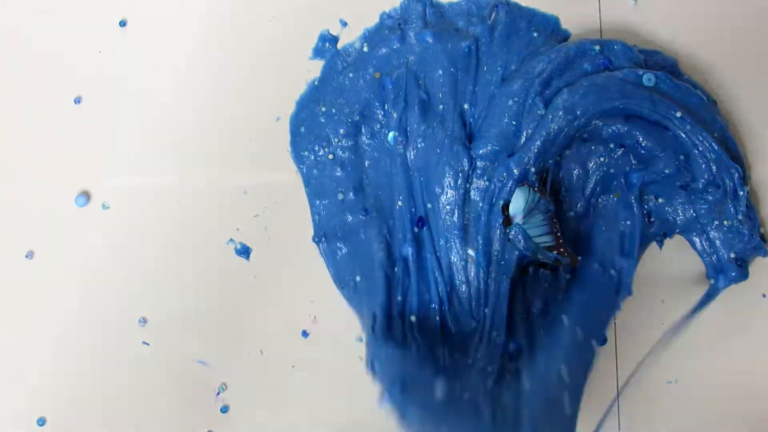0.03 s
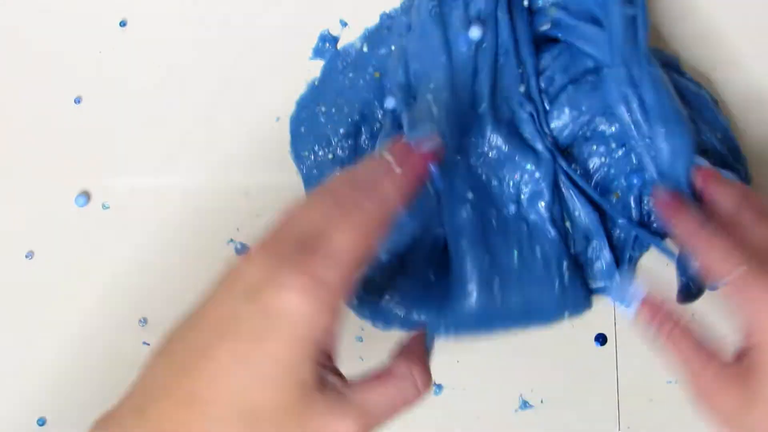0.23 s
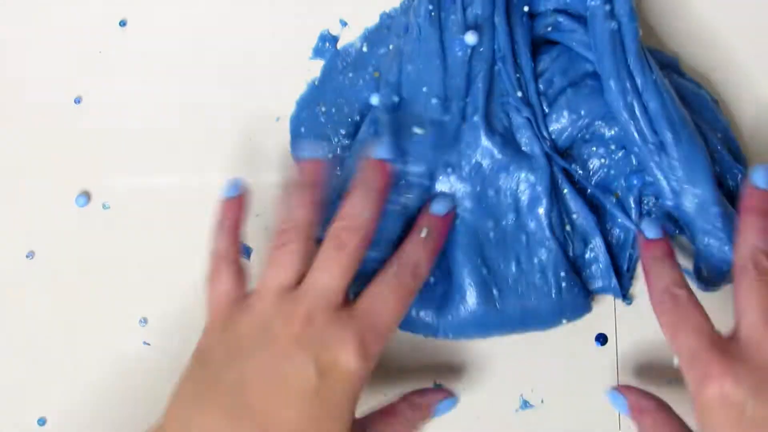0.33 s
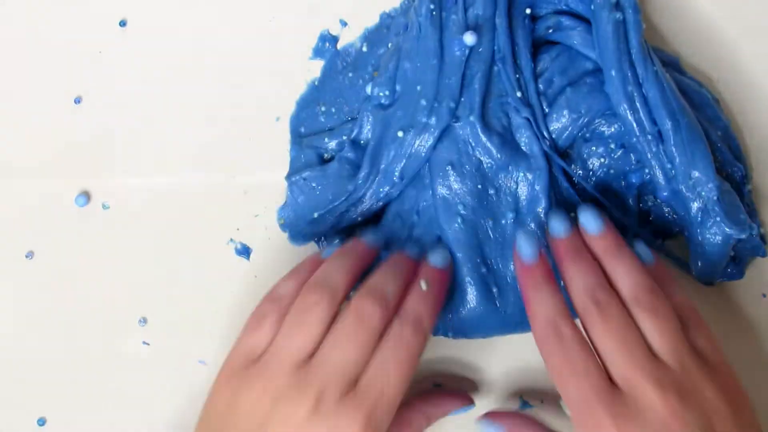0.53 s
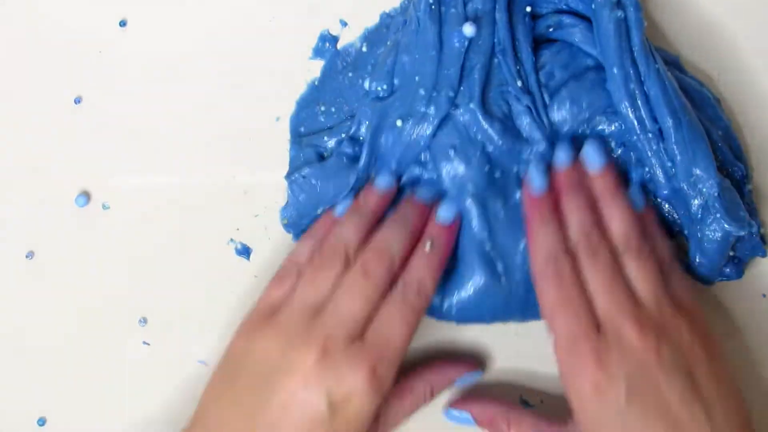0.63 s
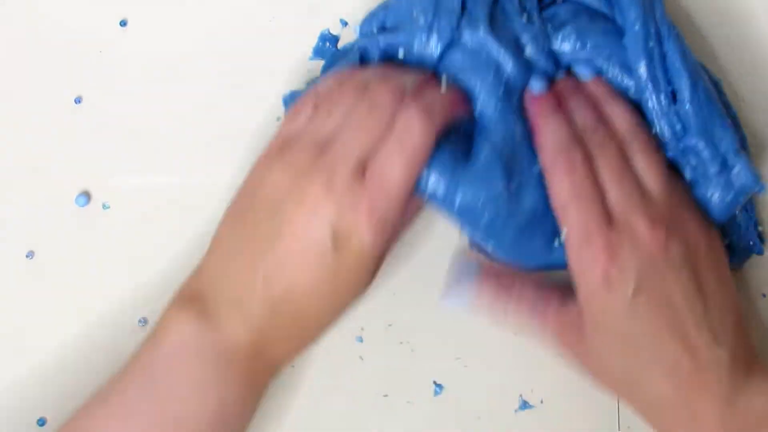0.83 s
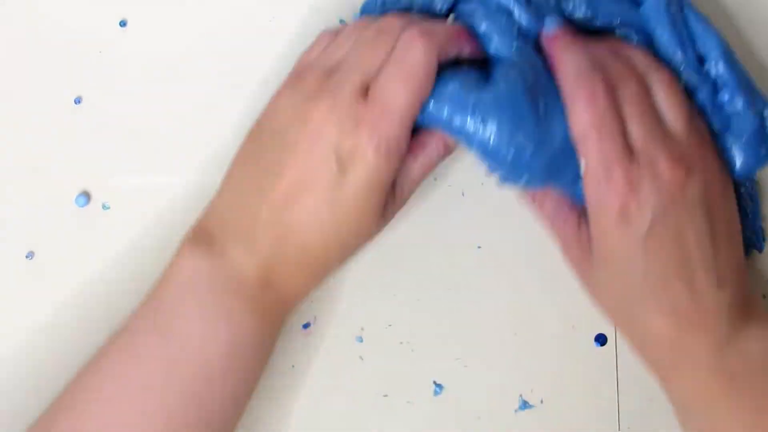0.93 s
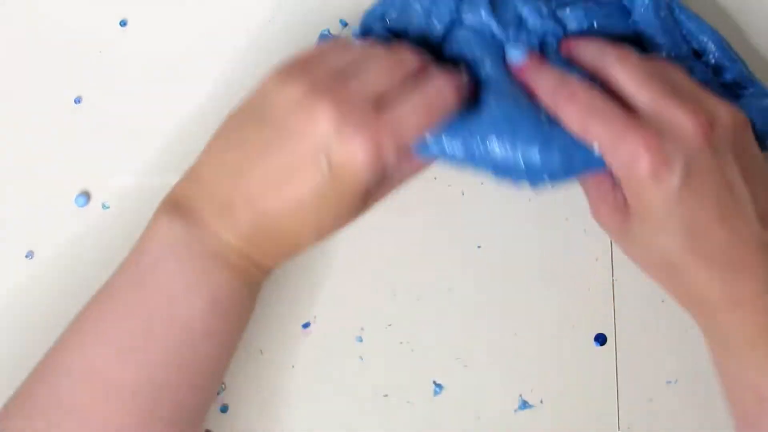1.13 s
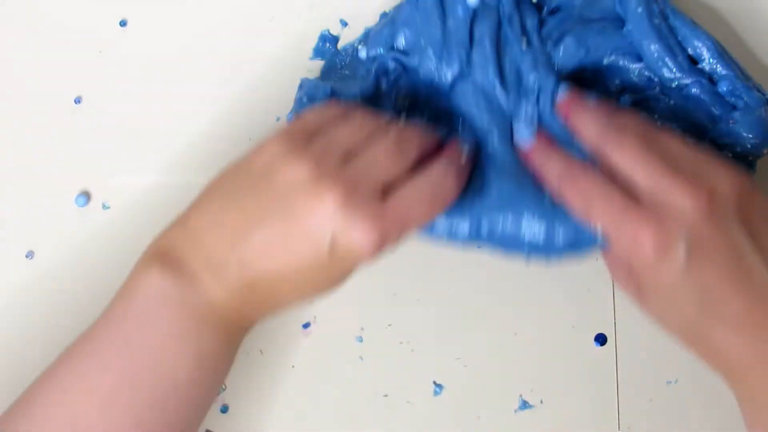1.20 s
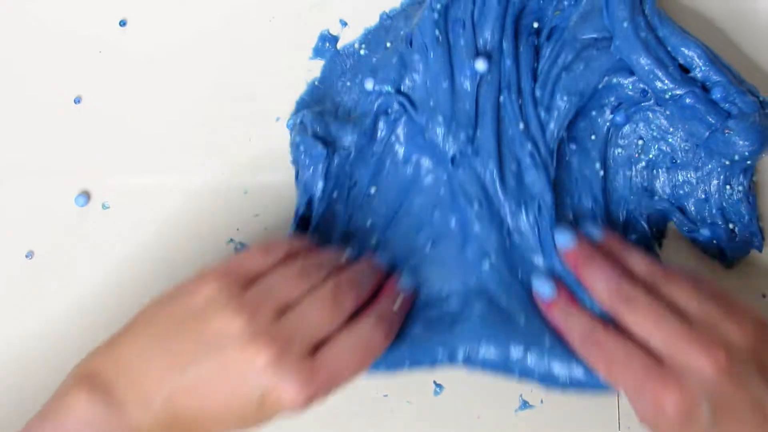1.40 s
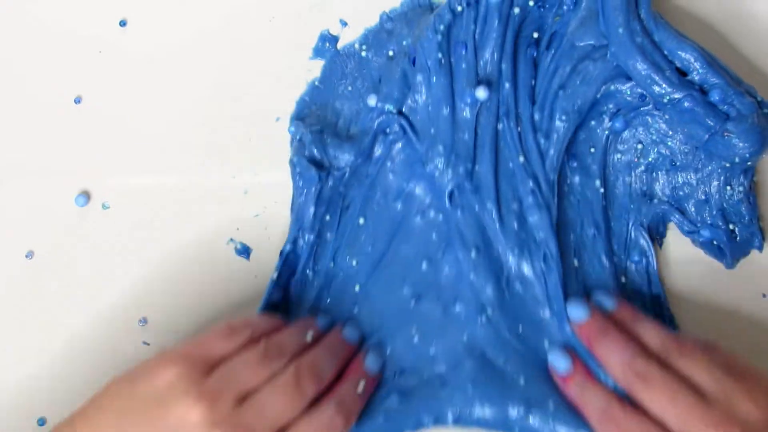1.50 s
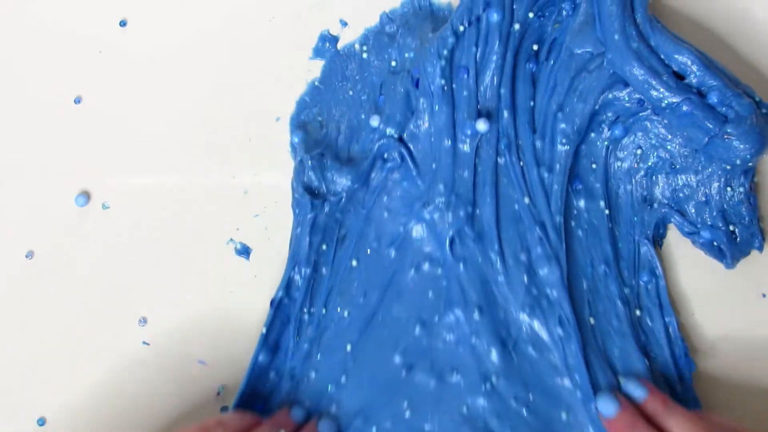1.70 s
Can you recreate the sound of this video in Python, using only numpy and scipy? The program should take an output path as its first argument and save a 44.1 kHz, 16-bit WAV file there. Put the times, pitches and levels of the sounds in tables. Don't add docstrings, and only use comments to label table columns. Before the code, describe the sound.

Sticky slime pressed and spread by hands, snapping, popping and crackling wetly in a small hard room

```python
import sys
import numpy as np
from scipy import signal
from scipy.io import wavfile
from scipy.ndimage import uniform_filter1d

SR = 44100
rng = np.random.default_rng(int(sys.argv[2]) if len(sys.argv) > 2 else 0)


def generate_wav(sig):
    pcm = np.round(np.clip(np.atleast_2d(sig).T, -1, 1) * 32767).astype(np.int16)
    wavfile.write(sys.argv[1], SR, pcm)


def nominal_scale(level):
    x = np.asarray(level, float) / 20
    return 10 ** x


N = 77175


def evened(x):
    return x / np.sqrt(np.mean(x ** 2) + 1e-20)


def read(points, hz):
    f, value = np.transpose(points)
    return np.interp(np.log(hz + 1), np.log(f + 1), value)


def causal(db):
    log_gain = np.log(nominal_scale(np.maximum(db, -100)))
    full = np.concatenate([log_gain, log_gain[-2:0:-1]])
    return np.fft.ifft(np.exp(np.conj(signal.hilbert(full)))).real[:len(db)]


def coloured(x, points):
    taps = causal(read(points, np.linspace(0, SR / 2, 1025)))
    return signal.oaconvolve(x, taps[None], axes=1)[:, :N]


def hum():
    # pitch_hz, level_db (per Hz)
    hum_colour = [(12, -23), (20, -7), (128, -7.5), (218, -12), (440, -8), (1740, -21), (8890, -29),
                  (15200, -74), (16500, -44)]
    # pitch_hz, likeness (0 to 1)
    ear_likeness = [(60, 0.15), (180, 0.033), (550, 0.12), (1650, 0.15), (4970, 0.44), (15000, .5)]
    level_db, patch_db = -57.5, 2
    frames, hz = N // 256 + 5, np.fft.rfftfreq(1024, 1 / SR)
    a, b, c, d, patches = rng.standard_normal((frames, 513, 5)).T
    patches = uniform_filter1d(patches, size=8, axis=0)
    patches = evened(uniform_filter1d(patches, size=14, axis=1))
    same = np.clip(read(ear_likeness, hz), -1, 1)[:, None]
    left = a + 1j * b
    right = same * left + np.sqrt(1 - same ** 2) * (c + 1j * d)
    spectrum = np.array([left, right]) * nominal_scale(read(hum_colour, hz)[:, None] + patch_db * patches)
    noise = signal.istft(spectrum, nperseg=1024, noverlap=768)[1][:, :N]
    return nominal_scale(level_db) * evened(noise)


def crackle(points, per_s, spread_db, smooth_db, grain_s):
    size = nominal_scale(spread_db * np.minimum(rng.exponential(1, N), 3)) * (rng.random(N) < per_s / SR)
    t = np.arange(600) / SR
    kind, grains = rng.integers(0, 24, N), np.zeros((2, N))
    for i, hz in enumerate(np.geomspace(points[1][0], points[-2][0], 24)):
        grain = np.sin(2 * np.pi * hz * t) * t * np.exp(-t / grain_s)
        ear_gain = nominal_scale(rng.uniform(0.65, 1.1, (2, 1)))
        grains += ear_gain * signal.oaconvolve(size * (kind == i), grain)[:N]
    both, own = rng.standard_normal(N), rng.standard_normal((2, N))
    hiss = 1.06 * both + 1.9 * own
    return evened(coloured(evened(grains) + nominal_scale(smooth_db) * hiss, points))


def slime():
    # start_s, level_db, squelch_db (share of wet squelch)
    effort = [(0, -49, 4.5), (0.132, -50, 1.5), (.17, -41, 1), (0.206, -45, 1.5), (0.23, -33, 11.5),
              (0.301, -47, 15), (.54, -68.5, 6.5), (0.634, -44, -2), (.78, -44.5, -3.5), (0.918, -53, 4.5),
              (1.018, -43, -1.5), (1.04, -60, 7), (1.09, -55, 5.5), (1.127, -46.5, -3.5), (1.3, -46, 5),
              (1.43, -45, -1), (1.56, -50.5, -1), (1.75, -51, 0)]
    # pitch_hz, level_db (per Hz)
    fizz_colour = [(880, -20.5), (1500, -15), (3250, -7.5), (8510, -8), (14600, -21), (16000, -44),
                   (16500, -55)]
    # pitch_hz, level_db (per Hz)
    squelch_colour = [(300, -11), (800, -3.5), (1050, -5), (1380, 0), (1800, -2), (2350, -2), (3200, -6.5),
                      (7000, -14)]
    s, db, wet_db = np.transpose(effort)
    t = np.arange(N) / SR
    lumps = uniform_filter1d(rng.standard_normal(N), size=900)
    lumps = evened(uniform_filter1d(lumps, size=900))
    fizz = crackle(fizz_colour, per_s=350, spread_db=4.5, smooth_db=2.5, grain_s=.0001)
    squelch = crackle(squelch_colour, per_s=500, spread_db=2.8, smooth_db=4, grain_s=.0009) * nominal_scale(-4)
    wet = squelch * nominal_scale(np.interp(t, s, wet_db) + 1.14 * lumps)
    return nominal_scale(np.interp(t, s, db)) * (nominal_scale(-1.5) * fizz + wet)


def bursts(table, skirt_db):
    steep_db, low_steep, click_share = -9.5, 0.7, 0.31
    out, hz, t = np.zeros((3, N + 4096)), np.linspace(1, SR / 2, 1025), np.arange(1024) / SR
    air = rng.standard_normal((len(table), 1024))
    for (s, db, cavity_hz, breadth, tear_ms, wall_db), puff in zip(table, air):
        away = np.log2(hz / cavity_hz) / max(breadth, 1 / 8)
        peak = nominal_scale(steep_db * (away * np.where(away < 0, low_steep, 1)) ** 2)
        skirt = nominal_scale(skirt_db) * np.minimum(hz / cavity_hz, (cavity_hz / hz) ** 0.22)
        cavity = causal(20 * np.log10(peak + skirt))
        drive = puff * np.exp(-t * 1000 / max(tear_ms, .05))
        drive[0] -= click_share * np.linalg.norm(drive)
        sound = signal.fftconvolve(drive, cavity)
        gain, at = nominal_scale(db) / abs(sound).max(), round(s * SR)
        out[0, at:at + len(sound)] += gain * sound
        share = nominal_scale(np.array([[0], [wall_db]]))
        out[1:, at:at + len(cavity)] += gain * share * np.linalg.norm(drive) * cavity
    return out[:, :N]


def pops():
    # start_s, peak_db, pitch_hz, breadth_octaves
    small_bursts = [(0.036, -41, 1900, .3), (0.189, -42, 835, 0.33), (.199, -36.5, 817, 0.14),
                    (.220, -40, 6050, 0.33), (0.2275, -32, 870, 0.2), (0.3166, -24.5, 5930, 0.21),
                    (0.333, -32.5, 10700, 0.43), (.616, -42.5, 3020, 0.2), (.634, -33, 2180, .3),
                    (0.655, -20.5, 2270, 0.25), (0.762, -38, 1510, .5), (0.8, -27.5, 3620, 0.48),
                    (0.813, -31, 7000, 0.49), (.927, -40, 5300, 0.24), (.983, -35, 4600, 0.21),
                    (1.007, -40, 7000, .3), (1.0789, -33.5, 2120, 0.68), (1.185, -46, 375, 0.52),
                    (1.1925, -36, 7900, 0.4), (1.278, -35, 1600, 1), (1.310, -44, 2400, 0.12),
                    (1.315, -32, 7800, 0.43), (1.3515, -26, 2880, 0.24), (1.354, -33.5, 1440, 0.38),
                    (1.422, -35, 7400, 0.7), (1.433, -52, 1490, 0.2), (1.465, -51, 786, 0.13),
                    (1.612, -40, 12040, .4), (1.672, -45, 6750, 0.37), (1.698, -39, 3300, 0.42),
                    (.1490, -22.5, 13300, 0.1), (.1520, -27.5, 12900, 0.13), (0.227, -15.5, 13100, .12),
             (0.3969, -26.5, 3330, 0.84), (0.5580, -43.5, 493, 0.33), (0.653, -44, 510, 0.46),
             (0.6547, -34.5, 1260, 0.39), (0.660, -17, 6700, 0.18), (0.965, -34, 2580, 0.36),
             (1.732, -45, 8000, 0.36), (1.1990, -37.5, 4330, 0.57), (1.1337, -40, 10200, 0.47),
             (1.1403, -35, 11200, 0.19), (1.535, -35, 7000, 0.62), (1.647, -59, 8900, 0.66),
             (1.683, -41.5, 9900, 0.61)]
    tear_ms, wall_db = 0.8, -1.5
    return bursts([(*row, tear_ms, wall_db) for row in small_bursts], skirt_db=-32)


def snaps():
    # start_s, peak_db, pitch_hz, tear_ms, wall_db (share thrown to the walls)
    pockets = [(.1492, -28.5, 5660, 5.1, 6), (0.1475, -43, 9000, 0.57, -2), (0.228, -9, 8400, 1.8, -3),
               (.2290, -15.5, 4500, 5.1, 10.5), (0.2453, -5, 5840, 4, -13), (0.2472, -15.5, 3580, 2.6, 0.5),
               (0.2507, -3.5, 2540, 0.7, -1), (0.262, -20, 9000, .6, -29), (0.3958, -15, 10200, 2.1, 10),
               (0.5575, -27.5, 4000, 1.8, 2.5), (0.5599, -33, 1210, 1, -7), (0.6533, -7, 5500, 1, 2),
               (0.6546, -7, 7800, 5.6, -3), (.9632, -9.5, 13200, 0.077, -5.5), (0.963, -29, 5050, 13, 5),
               (1.098, -35, 7700, 5.2, 8), (1.1966, -14, 7060, 0.22, 5), (1.2778, -28.5, 8300, 0.25, -13),
               (1.3615, -22, 7900, 1.6, 5.5), (1.414, -34.5, 2630, 1.1, -6), (1.478, -29, 10000, 1, 5),
               (1.511, -34, 2280, 0.88, 2.5), (1.5528, -23.5, 9400, 0.33, -25),
               (1.7147, -30.5, 7240, 0.86, -6)]
    breadth = 1
    return bursts([(s, db, hz, breadth, ms, wall) for s, db, hz, ms, wall in pockets], skirt_db=-20)


def rings():
    # start_s, peak_db, pitch_hz, t60_ms, glide_octaves (per 10 ms)
    hollows = [(.2305, -22, 4100, 12, 0), (.2335, -26, 1650, 20, 0), (.2451, -10, 1750, 6, 0),
               (.2458, -10, 5100, 5, 0), (.2477, -4, 3400, 10, -.4), (.2490, -10, 2400, 8, -.6),
               (.2505, -5, 1800, 5, -.8), (.2528, -20, 900, 16, 0), (.2552, -17, 1800, 9, 0),
               (.2590, -25, 1700, 20, 0), (.3965, -19, 9300, 8, 0), (.3972, -18, 7300, 6, 0),
               (.5572, -31, 5300, 12, 0), (.5573, -39, 1000, 6, 0), (.5592, -37, 3200, 6, 0),
               (.5594, -31, 1050, 8, 0), (.5628, -38, 4400, 5, 0), (.5680, -46, 900, 15, 0),
               (.6534, -5, 5400, 5, 0), (.6550, -14, 13500, 8, 0), (.6536, -18, 3430, 50, 0),
               (.6537, -22, 5168, 40, 0), (.6538, -21, 6020, 35, 0), (.6540, -29, 4600, 70, 0),
               (.6541, -20, 8900, 14, 0), (.6560, -21, 6735, 45, 0), (.6560, -24, 2130, 60, 0),
               (.6560, -28, 2500, 60, 0), (.9631, -11, 13800, 2, 0), (.9640, -27, 9000, 8, 0),
               (1.0110, -45, 1200, 45, 0), (1.0150, -49, 500, 35, 0), (1.0180, -38, 4150, 30, -.03),
               (1.0786, -31, 2300, 3.5, 0), (1.0796, -40, 4150, 8, 0), (1.0830, -42, 2800, 6, 0),
               (1.1963, -12, 9800, 1.6, 0), (1.2150, -48, 800, 35, 0), (1.2800, -46, 2350, 90, 0),
               (1.4310, -40, 1490, 30, 0)]
    rise_ms, scatter_db, wall_db = .2, -3, -6
    pair, beat = .035, .45
    out, t = np.zeros(N + 4096), np.arange(4096) / SR
    for s, db, hz, t60_ms, glide in hollows:
        turns = np.cumsum(hz * 2 ** (glide * np.minimum(t, .01) * 100)) / SR
        swell = 1 - np.exp(-t * 1000 / rise_ms)
        swell *= 1 - beat + beat * np.cos(2 * np.pi * pair * turns)
        decay = np.exp(-np.log(1000) * 1000 * t / t60_ms)
        out[round(s * SR):][:len(t)] -= nominal_scale(db) * decay * swell * np.sin(2 * np.pi * turns)
    return out[:N] * nominal_scale(np.array([[0], [scatter_db], [wall_db]]))


def thud():
    start_s, level_db, pitch_hz, t60_s, rise_s = 0.235, -37.5, 107, 0.22, 0.0084
    t = np.maximum(np.arange(N) / SR - start_s, 0)
    band = signal.butter(2, [pitch_hz / 2, pitch_hz * 4.4], "band", fs=SR)
    shake = signal.lfilter(*band, rng.standard_normal((2, N)))
    shake = evened(shake + shake[::-1] * 0.96)
    return nominal_scale(level_db - 60 * t / t60_s) * np.minimum(t / rise_s, 1) * shake


def room(direct, scattered, far):
    # pitch_hz, t60_s
    wall_decay = [(250, 0.32), (700, 0.25), (2000, 0.36), (5000, 0.29), (9000, 0.3), (15000, 0.2)]
    # delay_s, level_db
    bounces = [
        (.0021, -7),
        (.0031, -9.5),
        (.0058, -36),
    ]
    near_s, near_db, wall_db, left_db = .006, -8, -6.5, -0.5
    wall_s, wall_rise_s, early = .015, .007, .55
    taps = np.zeros((2, SR // 2 + 40))
    slots = np.arange(20, SR // 2, 6)
    at = slots + rng.integers(0, 6, (2, len(slots)))
    np.put_along_axis(taps, at, rng.choice([-1., 1.], at.shape), 1)
    t = np.arange(taps.shape[1]) / SR
    near = (taps + 0.32 * taps[::-1]) * np.exp(-t / near_s)
    near = nominal_scale(near_db) * near / np.linalg.norm(near[0])
    hz, tt, z = signal.stft(taps, SR, nperseg=256)
    fading = z * nominal_scale(-60 * tt / read(wall_decay, hz)[:, None])
    tail = signal.istft(fading, SR, nperseg=256)[1][:, :len(t)]
    tail = tail * (early + (1 - early) * np.clip((t - wall_s) / wall_rise_s, 0, 1))
    tail = nominal_scale(wall_db) * tail / np.linalg.norm(tail[0])
    table = np.zeros((2, 1000))
    for k, (s, db) in enumerate(bounces):
        table[0, round(s * SR)] += nominal_scale(db - 15) * (-1) ** k
        table[1, round(s * SR) + 3 * (k - 1)] += nominal_scale(db) * (-1) ** k
    table[:, 0] += nominal_scale(np.array([left_db, -left_db]))
    paths = [(direct, table), (scattered, near), (far, tail)]
    return sum(signal.fftconvolve(x[None], path, axes=1)[:, :N] for x, path in paths)


def scene():
    direct, scattered, far = snaps() + pops() + rings()
    bed = slime() + thud() + hum()
    return room(direct, scattered, far) + nominal_scale(np.array([[-.6], [.6]])) * bed


def roll_off(x):
    return signal.sosfilt(signal.butter(12, 16970, fs=SR, output="sos"), x)


def record(dry):
    click_edge_hz, edge_hz, quiet_edge_hz = 16900, 15850, 15350
    quiet_db, click_db = -74, -60
    high, low, lower = (
        signal.oaconvolve(dry, signal.firwin(1023, hz, window=("kaiser", 8), fs=SR)[None], "same")
        for hz in (click_edge_hz, edge_hz, quiet_edge_hz))
    top = ((dry - lower) ** 2).mean(0)
    quick, slow = abs(uniform_filter1d(top, size=128)), abs(uniform_filter1d(top, size=1500))
    clicks = (quick > 3 * slow) & (quick > nominal_scale(2 * click_db))
    sudden = uniform_filter1d(1. * clicks, size=200) > 0
    loud = (10 * np.log10(slow + 1e-20) > quiet_db) | sudden
    mix = lower + uniform_filter1d(1. * loud, size=400) * (low - lower)
    mix = mix + uniform_filter1d(1. * sudden, size=64) * (high - low) / 2
    return roll_off(np.clip(mix, -.98, .98))


dry = scene()
out = record(dry)
generate_wav(out)
```